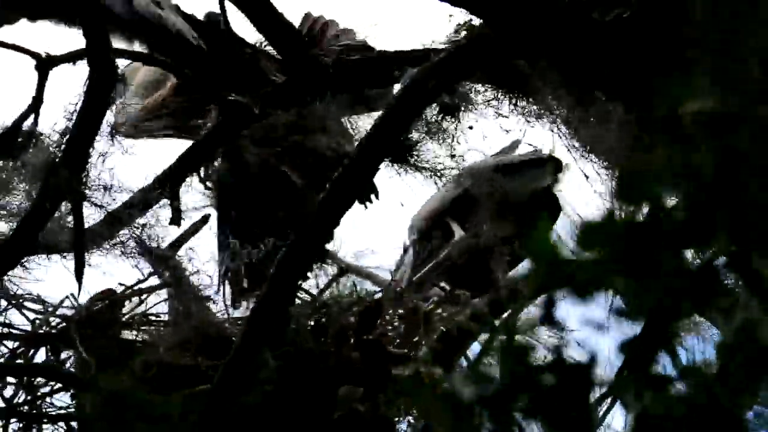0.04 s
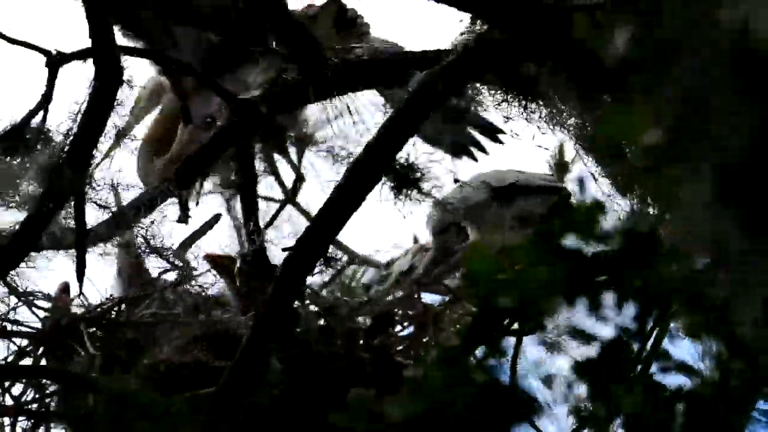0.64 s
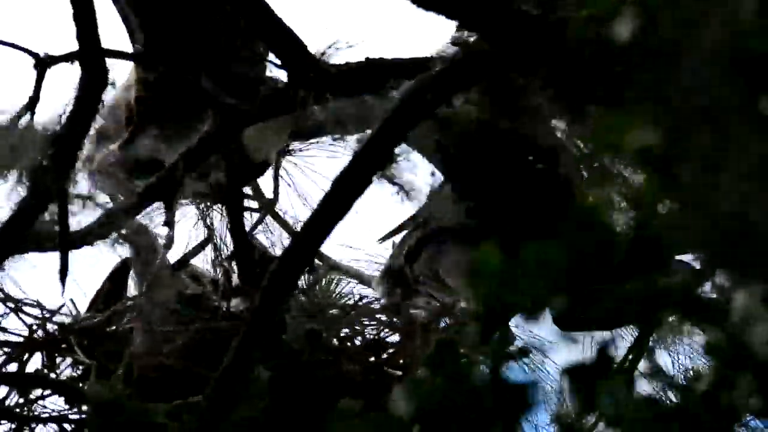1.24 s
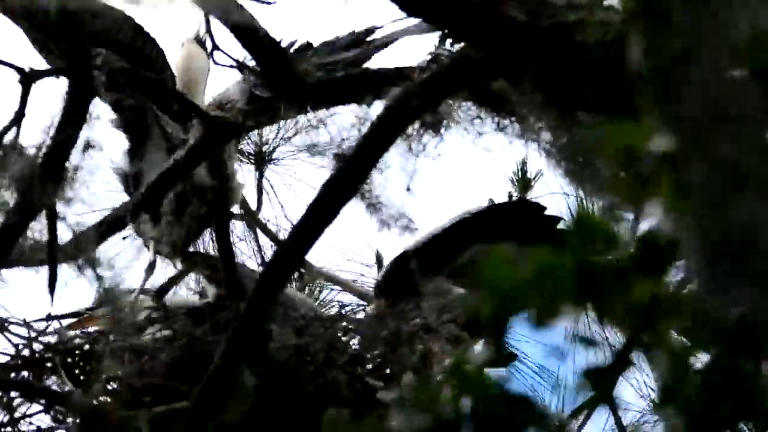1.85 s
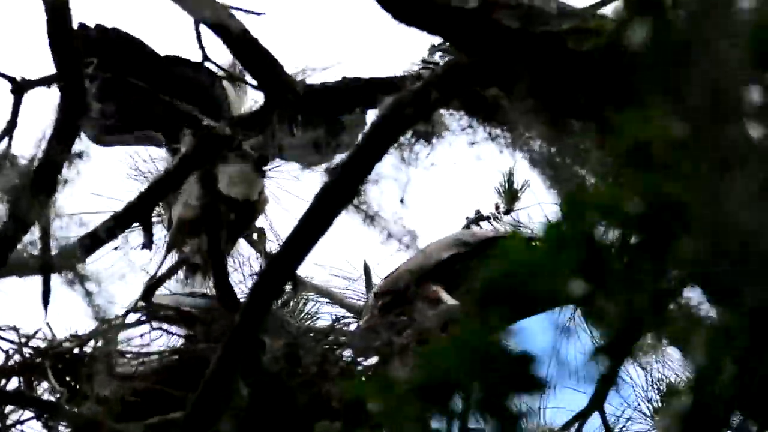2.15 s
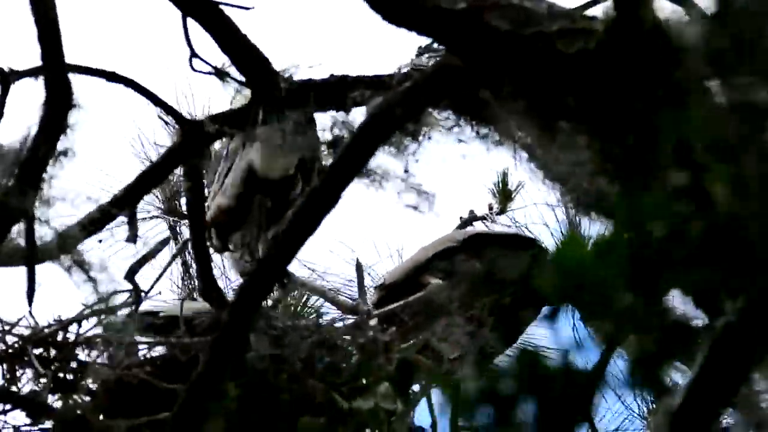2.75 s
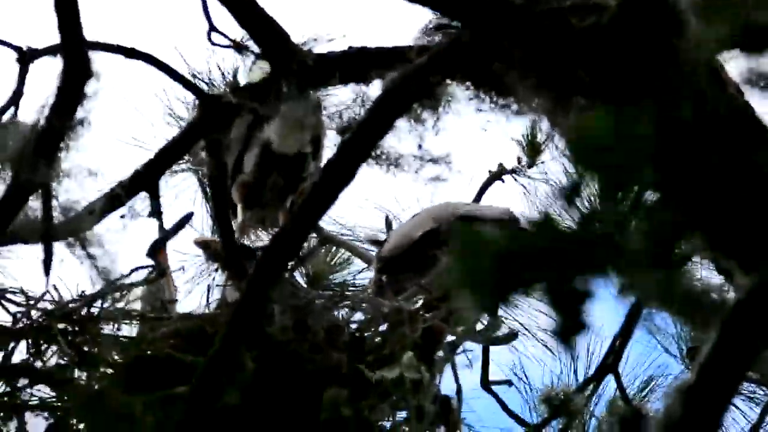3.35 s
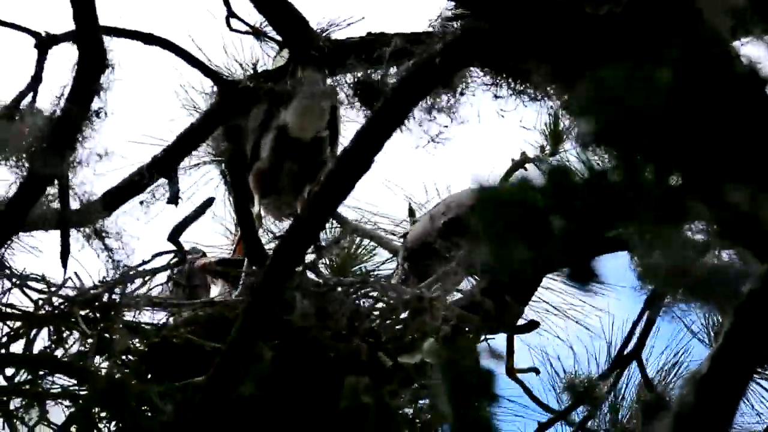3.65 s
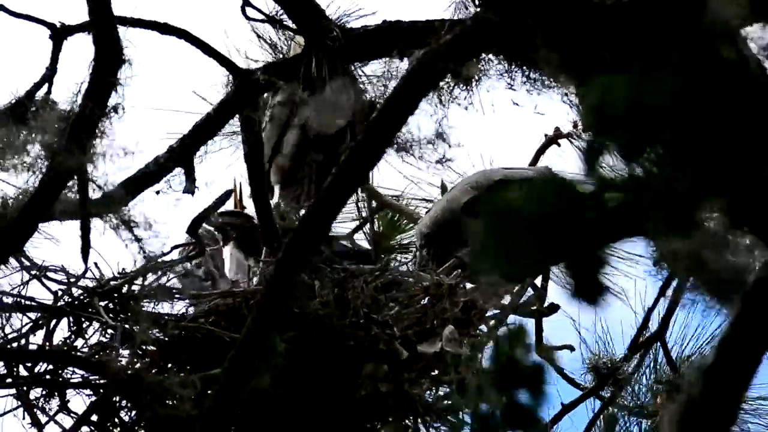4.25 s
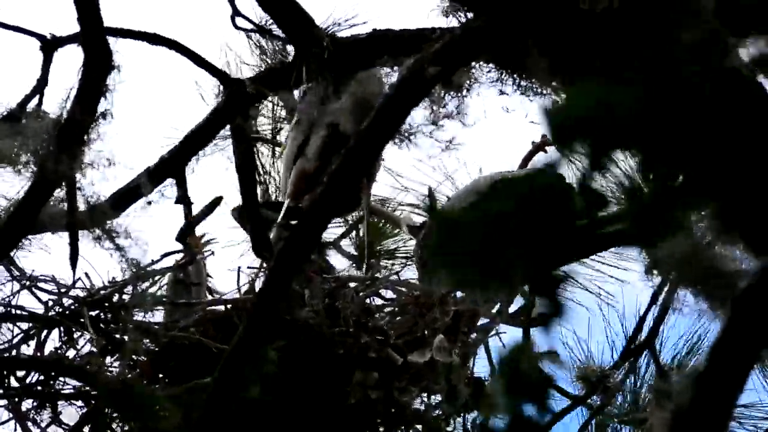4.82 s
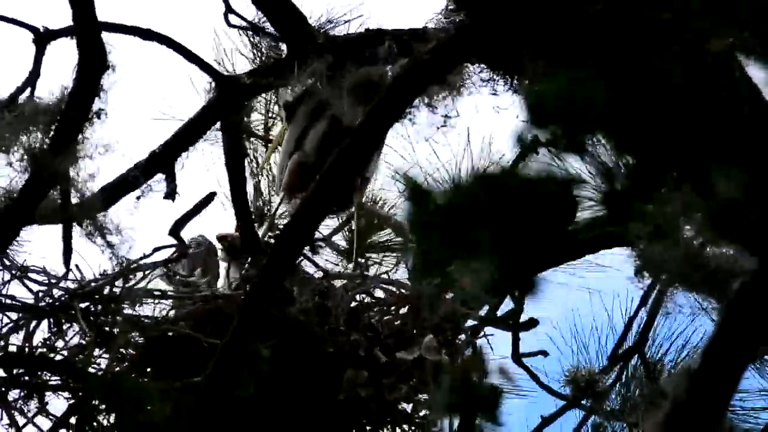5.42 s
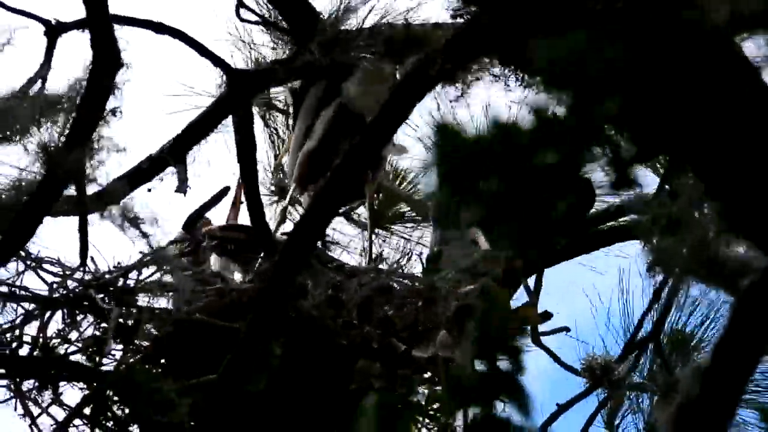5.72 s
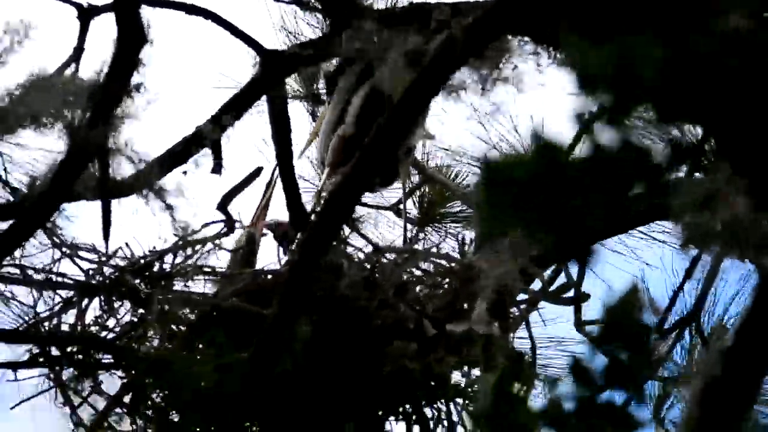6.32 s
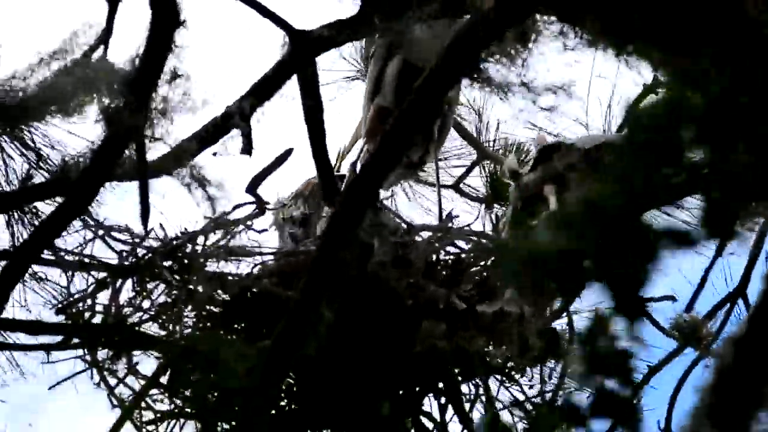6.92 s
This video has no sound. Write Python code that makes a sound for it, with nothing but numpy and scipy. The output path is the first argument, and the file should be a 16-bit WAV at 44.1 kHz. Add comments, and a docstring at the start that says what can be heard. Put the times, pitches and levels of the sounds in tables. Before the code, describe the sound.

A light breeze rushes in distant treetops and hisses in nearby leaves throughout. In the first half second, wings whoosh softly and brush a stick nest, followed by a few thin, hoarse squeals. At about 0.5 seconds, heron chicks high in a pine start begging with harsh, rattling clacks, about seven a second, the loudest sound in the scene. This first bout peaks around 2 seconds and fades just before 3. A second, slightly softer bout runs from 3.3 to 5.2 seconds, and a third builds from 5.6 and continues to the end at 7. The calls come from straight ahead at some distance, with a short woodland echo. Feathers swish briefly against twigs near 0.8, 2.7, 5.6 and 6.2 seconds, with another dull wing whoosh at 5.6. A very faint, low, faraway hum comes and goes between 2.5 and 5.5 seconds.

```python
"""A light breeze and a brush of wings, then heron chicks burst out begging from a stick nest high in a pine:
three bouts of harsh, clacking calls, about seven a second, the first opening with thin squeals.
Each call is a short rattle of uneven pulses ringing in throat and bill, scattered by branches and
echoed by the wood. Feathers swish on the twigs, leaves hiss, and a faint low hum swells far away."""
import sys
import numpy as np
from scipy import signal
from scipy.fft import rfft, irfft, next_fast_len
from scipy.io import wavfile
from scipy.ndimage import uniform_filter1d

SR = 44100
rng = np.random.default_rng(int(sys.argv[2]) if len(sys.argv) > 2 else 0)


def bounce(signal):
    """Save signal as a 16-bit WAV file at the path given by the first command-line argument."""
    frames = np.transpose(np.atleast_2d(signal))
    limited = np.clip(frames, -1, 1)
    pcm = np.round(limited * 32767).astype(np.int16)
    wavfile.write(sys.argv[1], SR, pcm)


N = 311787
TIME = np.arange(N) / SR


def from_db(db):
    """Decibels to gain."""
    return 10 ** (np.asarray(db) / 20)


def rms_one(x):
    """Scale to unit power."""
    return x / np.sqrt(np.mean(x ** 2) + 1e-20)


def at_hz(points, hz):
    """Read a curve on a log-frequency axis."""
    points_hz, values = np.transpose(points)
    return np.interp(np.log(hz + 1e-6), np.log(points_hz), values)


def resonate(x, hz, width):
    """A two-pole resonance with gain 1 at its top."""
    r = np.exp(-np.pi * width / SR)
    poles = [1, -2 * r * np.cos(2 * np.pi * hz / SR), r * r]
    return signal.lfilter(np.array([1, 0, -1]) * (1 - r * r) / 2, poles, x + 1e-18)


def drift(rate_hz):
    """Smooth random modulation of unit power."""
    hop = 40
    r = np.exp(-2 * np.pi * rate_hz * hop / SR)
    slow = signal.lfilter([1], [1, -2 * r, r * r], rng.standard_normal(N // hop + 2002))[2000:]
    return np.interp(np.arange(N) / hop, np.arange(len(slow)), rms_one(slow))


def swells(rows):
    """A bell-shaped envelope for each (time [s], half-width [s], level [dB])."""
    return sum(from_db(db) * np.exp(-.5 * ((TIME - s) / width) ** 2) for s, width, db in rows)


# Stereo image, narrow in the bass and wide on top: (frequency [Hz], left-right correlation [0-1])
STEREO_LIKENESS = [(30, .85), (70, 0.99), (160, 0.99), (400, 0.98), (1200, 1), (2500, 0.89), (5000, 0.83),
                   (8000, 0.68), (12000, 0.15), (16000, .1)]

def diffuse(spectrum, size=N, likeness=STEREO_LIKENESS):
    """Coloured stereo noise from all around, mixed from mid and side."""
    padded = next_fast_len(size, True)
    hz = np.arange(padded // 2 + 1) * SR / padded
    mid, side = rfft(rng.standard_normal((2, padded))) * from_db(at_hz(spectrum, hz))
    alike = np.clip(at_hz(likeness, hz), 0, .999)
    stereo = np.sqrt(1 + alike) * mid + np.sqrt(1 - alike) * side * [[1], [-1]]
    return rms_one(irfft(stereo, padded)[:, :size])


# Swells of the far hum: (start [s], length [s], centre pitch [Hz], level [dB])
HUM_SWELLS = [(2.45, 1, 121.8, -65), (3.85, 0.57, 103, -68), (4.6, 0.94, 101.7, -60.5)]

def hum(fade_s, sag_hz_per_s, waver_db, waver_hz):
    """A low, wavering drone, perhaps a distant engine; each swell fades in, sags in pitch and fades out."""
    out = 0
    for start, length, hz, db in HUM_SWELLS:
        t = TIME - start
        envelope = np.clip(np.minimum(t, length - t) / fade_s, 0, 1)
        pitch = hz - sag_hz_per_s * (t - length / 2) + waver_hz * drift(4.5)
        out += from_db(db) * envelope * np.sqrt(2) * np.sin(2 * np.pi * np.cumsum(pitch) / SR)
    return out * from_db(waver_db * drift(6))


# Slow fader ride of the breeze, ahead of its gains: (time [s], rush level [dB], hiss level [dB])
BREEZE_RIDE = [(0, -50.5, -54), (1.3, -49.5, -55.5), (3.15, -49.3, -55.7), (4.4, -49.3, -55.5),
               (5.35, -49.7, -55), (7.07, -48, -53.3)]
# EQ of the low rush and of the leaf hiss: (frequency [Hz], gain [dB])
RUSH_EQ = [(15, -40), (25, -28), (40, -19), (58, -5), (120, -0.5), (200, -2.5), (300, 0.5), (520, 4.5),
           (800, 6.5), (1300, 4), (2000, -6.5), (4000, -5), (8000, -36)]
LEAF_EQ = [(500, -10), (2000, 12.5), (4000, 6.5), (6000, 6.5), (8000, 2.5), (11000, -1), (15500, -3.5)]

def breeze(rush_gain_db, hiss_gain_db, flutter_db):
    """Wind rushes in the far crowns and hisses in the near leaves."""
    times, *levels = np.transpose(BREEZE_RIDE)
    rush_db, hiss_db = [np.interp(TIME, times, level) for level in levels]
    crowns = from_db(rush_db + rush_gain_db) * diffuse(RUSH_EQ)
    leaves = from_db(hiss_db + hiss_gain_db + flutter_db * drift(13)) * diffuse(LEAF_EQ)
    return crowns + leaves


# EQ of a bassy puff of air: (frequency [Hz], gain [dB])
PUFF_EQ = [(15, -34), (40, -9), (70, -3), (125, -1), (190, -6), (300, -26), (2000, -70)]

def puff(at_s, half_width_s, db):
    """Air eddies at each microphone port on its own."""
    return swells([(at_s, half_width_s, db)]) * diffuse(PUFF_EQ, likeness=[(20, 0), (2000, 0)])


# Wing whooshes: (time [s], half-width [s], level [dB])
WING_WHOOSHES = [(.19, 0.097, -46), (3.17, 0.076, -59), (5.6, 0.083, -47)]

def shuffles():
    """The birds shift and spread their wings with a soft, dull whoosh."""
    dull_eq = [(300, -14), (600, -8), (850, -1), (1400, 1), (1900, -10), (5000, -34)]
    return swells(WING_WHOOSHES) * diffuse(dull_eq)


# Wings and feet brush the nest: (time [s], level [dB], attack [s], decay [s])
BRUSH_STROKES = [(.06, -51, 0.035, 0.065), (.375, -51, 0.0054, 0.083), (.44, -48.5, .03, .06),
                 (.815, -47, .006, 0.027), (2.728, -45.5, .008, 0.049), (5.598, -46, .001, 0.0039),
                 (6.18, -44.5, .004, .035)]
# Their crisp EQ: (frequency [Hz], gain [dB])
BRUSH_EQ = [(300, -34), (1500, 4), (4000, -11), (8000, 8.5), (13000, 4), (16000, 5)]

def brushes(grain_db):
    """Feathers on dry needles: short, grainy swishes."""
    envelope = sum(from_db(db) * np.exp(-np.abs(TIME - s) / np.where(TIME < s, attack, decay))
                   for s, db, attack, decay in BRUSH_STROKES)
    return envelope * rms_one(diffuse(BRUSH_EQ) * from_db(grain_db * drift(200)))


# Squeals that open the first bout: (time [s], half-width [s], level of each layer [dB])
SQUEAL_CUES = [(.35, .05, -49), (.403, .017, -39), (.492, .016, -37)]

def squeals(hz, width_hz):
    """A thin, unsteady whistle layered with an equally loud hoarse fringe."""
    hoarse = resonate(rng.standard_normal(N), hz, width_hz)
    whistle = resonate(hoarse, hz, width_hz)
    return swells(SQUEAL_CUES) * (rms_one(whistle) + rms_one(hoarse))


# EQ of the wood's reverb: (frequency [Hz], gain [dB])
REVERB_EQ = [(300, 8.5), (1400, 0), (2200, 0), (3500, 9.5), (6000, 9), (14000, -17.5)]

def wood(x, echo_db, build_s, t60_s):
    """Trunks and swaying crowns add a diffuse stereo tail to the direct sound, never twice the same."""
    t = TIME[:SR * 2 // 3]
    envelope = np.exp(-np.log(1000) * t / t60_s) * (1 - np.exp(-t / build_s))
    tail = diffuse(REVERB_EQ, size=len(t)) * envelope
    response = from_db(echo_db) * rms_one(tail) / np.sqrt(len(t))
    response[:, 0] += 1
    return signal.fftconvolve(x[None], response, axes=1)


def twigs(x, scatter_db, spread_s, near_s, count=160):
    """Branches add a spray of quick echoes that change as the chick moves; the nest returns the first."""
    lags = .0004 + rng.uniform(0, 3 * spread_s, count)
    gains = rng.standard_normal(count) * (np.exp(-lags / spread_s) + 2 * np.exp(-lags / near_s))
    echoes = np.bincount((lags * SR).astype(int), gains / np.sqrt(np.sum(gains ** 2)))
    return x + from_db(scatter_db) * signal.fftconvolve(x, echoes)[:len(x)]


def even_out(x, evenness):
    """Flatten the drive's spectrum part way, so that mostly the throat sets the vowel."""
    spectrum = rfft(x)
    magnitude = np.sqrt(uniform_filter1d(np.abs(spectrum) ** 2, 45) + 1e-12)
    return irfft(spectrum / magnitude ** evenness, len(x))


def rattle(t, swell_s, pulse_hz=219.9, jitter=.16, shimmer_db=1.04, rasp=.85, puff_s=.0038, open_s=.0075):
    """One call at the syrinx: uneven snaps, each with a puff of turbulence, swelling and dying away."""
    periods = np.exp(jitter * rng.standard_normal(120) + rng.normal(0, .12)) / pulse_hz
    onsets = (np.cumsum(periods) * SR).astype(int)
    strengths = from_db(shimmer_db * rng.standard_normal(len(onsets)))
    snaps = np.bincount(onsets, strengths, len(t))[:len(t)]
    puffs = signal.lfilter([1], [1, -np.exp(-1 / (puff_s * SR))], snaps)
    source = rms_one(snaps) + rasp * rms_one(puffs * rng.standard_normal(len(t)))
    body = signal.sosfilt(signal.butter(2, 2600, fs=SR, output="sos"), source)
    edge = signal.sosfilt(signal.butter(2, 2600, "high", fs=SR, output="sos"), source)
    # the bright edge comes a little later, as the bill opens
    push, gape = [np.exp(-.5 * np.abs(u / np.where(u < 0, swell_s, swell_s * 1.005)) ** 2.4)
                  for u in (t, t - open_s)]
    return body * push - edge * gape


# Formants of throat and open bill: (frequency [Hz], bandwidth [Hz], gain [dB])
FORMANTS = [(532, 56, -13.5), (848, 140, -16), (1098, 28, -17), (1275, 59, -7.5), (1428, 116, 4.5),
            (1544, 190, -2.5), (1804, 107, -2), (1940, 270, -7), (2145, 126, -3), (2466, 130, -10),
            (2716, 184, -12.5), (3060, 140, -15), (3486, 61, -14), (3920, 230, -21.5), (5200, 1200, -49)]

def throat(source, wander):
    """Throat and bill ring, tuned a hair differently on each call."""
    tension = 1 + wander * rng.standard_normal()
    return sum(from_db(db) * resonate(source, hz * tension, width) for hz, width, db in FORMANTS)


# Begging calls, bout by bout: (peak time [s], dry level over a quarter second [dB], gape lift [dB])
BEGGING_CALLS = [(.51, -37.5, -1), (.617, -30.5, -1), (.743, -31.5, 0), (.872, -32.5, -1.5),
                 (.992, -34.5, -1), (1.125, -38, -2), (1.263, -38.5, 0), (1.399, -32.5, -3),
                 (1.527, -31.5, -1.5), (1.66, -32, -3.5), (1.797, -32.5, 2.5), (1.927, -30, -.5),
                 (2.056, -29, 0), (2.185, -29.5, 3.5), (2.318, -29, 2), (2.453, -31.5, -1.5),
                 (2.591, -34.5, 6), (2.732, -34.5, -.5), (2.881, -37.5, 2.5), (3.278, -41, -1.5),
                 (3.389, -35.5, 2.5), (3.514, -33.5, 1.5), (3.641, -34.5, 1.5), (3.771, -36, 4.5),
                 (3.91, -35.5, -1), (4.044, -33.5, 1.5), (4.179, -35.5, 2), (4.314, -36, 0),
                 (4.449, -37, 4), (4.587, -36, 5), (4.726, -34, 5), (4.862, -32, 2.5), (4.992, -30.5, 4),
                 (5.142, -33.5, 3), (5.552, -46, -1), (5.67, -39.5, -3), (5.802, -38.5, -3),
                 (5.931, -36, 2), (6.064, -31.5, -.5), (6.192, -30, -.5), (6.323, -31, -4),
                 (6.46, -31.5, 3.5), (6.592, -33, 2), (6.729, -33, 0), (6.865, -34, 0.5), (6.999, -37, 2)]
# Treble ride of the calls: (time [s], gain near 3 kHz [dB], gain near 6 kHz [dB])
TREBLE_RIDE = [(.72, 0, 1.5), (.9, .5, -2.5), (1.62, -2.5, 1), (1.8, 3, -5), (2.15, 3, -3), (2.65, -4, 4),
               (3.55, 1, 0), (4.18, -2.5, -4), (4.9, 2.5, 2), (5.75, 0, -6), (6.0, 4, 5), (6.19, 0, 5),
               (6.35, -1.5, -4), (6.62, 3.5, -2), (6.95, .5, -3)]
# EQ points for body, main resonance, gape and the two treble bands: (frequency [Hz])
CALL_BANDS = [900, 1450, 2050, 2850, 5500]
# Lows and highs are lost on the way from the nest: (frequency [Hz], gain [dB])
DISTANCE_EQ = [(200, -25), (450, -4), (900, 4), (3200, 3), (4500, -2.5), (6000, -7), (8000, -9.5),
               (12000, -18), (16000, -28)]

def chicks(usual_db, swell_s, clack_swell_s, rest_s, curter_s_per_db, thinner_db_per_db):
    """Rattles ring the throat, coloured by the bill's gape; a harder call is curter and has less body."""
    size = SR // 4
    t = np.arange(size) / SR - .08   # zero at the call's peak
    bins_hz = np.arange(size // 2 + 1) * SR / size
    out = np.zeros((2, N + 2 * SR))
    treble_s, *treble_bands = np.transpose(TREBLE_RIDE)
    previous_s = BEGGING_CALLS[0][0]
    for s, db, gape_db in BEGGING_CALLS:
        effort_db = db - usual_db
        rested = s - previous_s > rest_s   # after a rest, the bout opens with a short clack
        previous_s = s
        source = rattle(t, clack_swell_s if rested else swell_s - curter_s_per_db * effort_db)
        scattered = twigs(source, scatter_db=1.5, spread_s=.026, near_s=.0032)
        voice = throat(even_out(scattered, evenness=.5), wander=.005)
        treble_db = [np.interp(s, treble_s, band) for band in treble_bands]
        bands_db = [-thinner_db_per_db * effort_db, 0, gape_db] + treble_db
        eq_db = np.interp(bins_hz, CALL_BANDS, bands_db) + at_hz(DISTANCE_EQ, bins_hz)
        call = from_db(db) * rms_one(irfft(rfft(voice) * from_db(eq_db), size))
        heard = wood(call, echo_db=-8.5, build_s=.0073, t60_s=.57)
        start = round((s + t[0]) * SR)
        out[:, start:start + heard.shape[1]] += heard
    return out[:, :N]


def scene():
    """The nest is straight ahead, the wood all around."""
    calls = chicks(usual_db=-34, swell_s=.0195, clack_swell_s=.009, rest_s=.25,
                   curter_s_per_db=.0002, thinner_db_per_db=.35)
    calls += squeals(hz=2160, width_hz=280)
    feathers = brushes(grain_db=2.5) + shuffles()
    air = breeze(rush_gain_db=6, hiss_gain_db=8.3, flutter_db=.6)
    air += puff(at_s=.35, half_width_s=.055, db=-53)
    drone = hum(fade_s=.095, sag_hz_per_s=1.8, waver_db=2.5, waver_hz=.92)
    return drone + air + feathers + calls


def record(dry):
    """The right side is a touch louder; a steep low-pass cuts the top."""
    low_pass = signal.ellip(12, .1, 80, 15800, fs=SR, output="sos")
    return signal.sosfilt(low_pass, dry * from_db([[-.15], [.15]]))


dry = scene()
out = record(dry)
bounce(out)
```